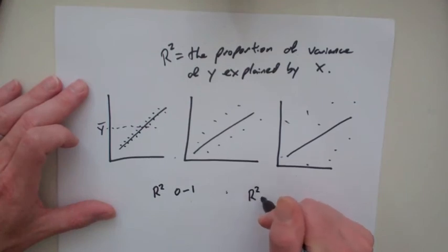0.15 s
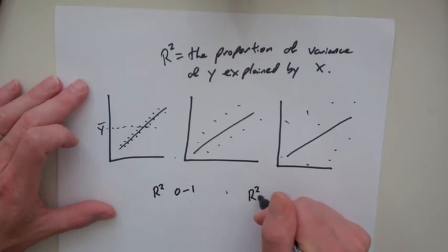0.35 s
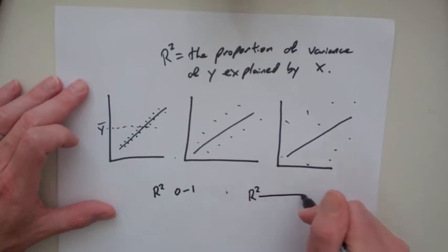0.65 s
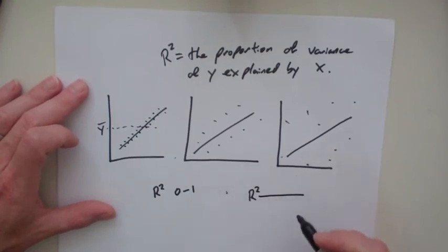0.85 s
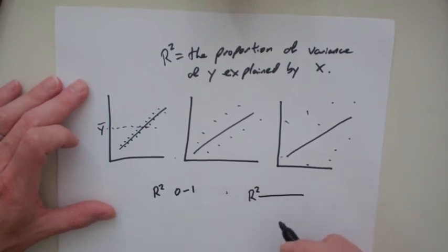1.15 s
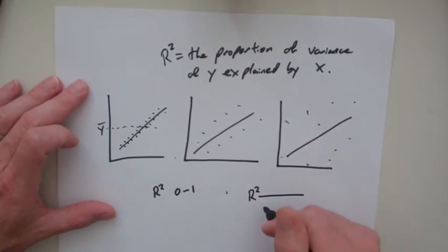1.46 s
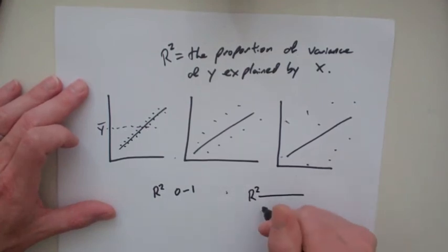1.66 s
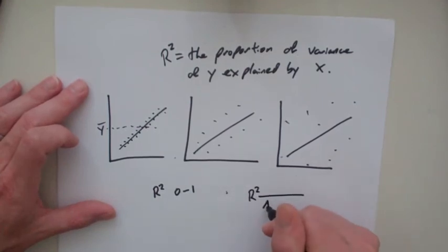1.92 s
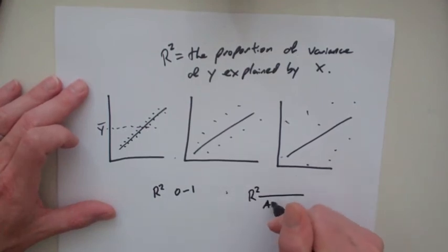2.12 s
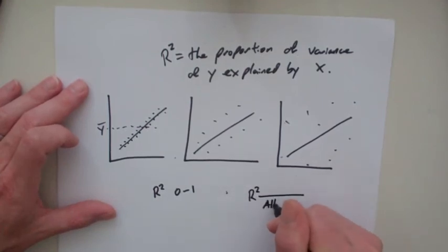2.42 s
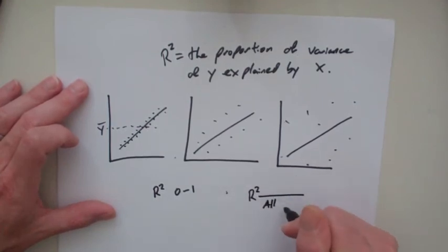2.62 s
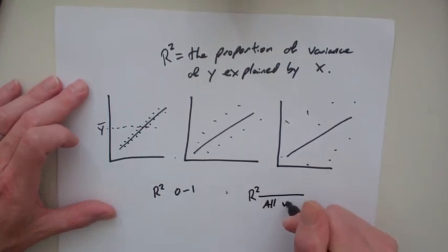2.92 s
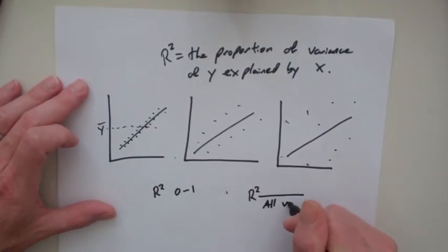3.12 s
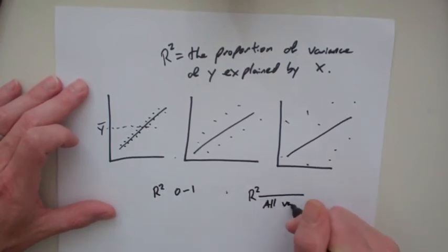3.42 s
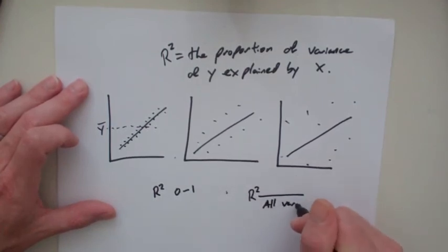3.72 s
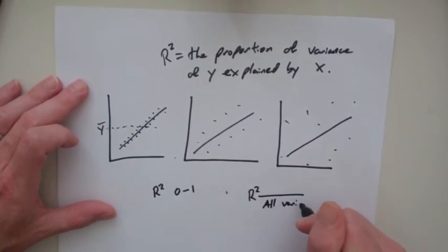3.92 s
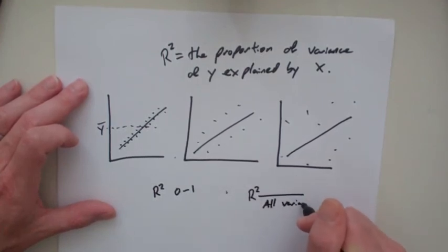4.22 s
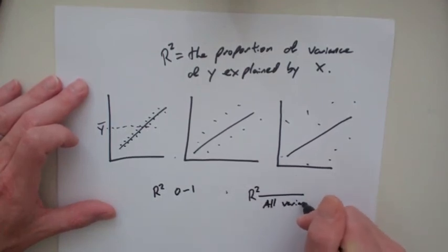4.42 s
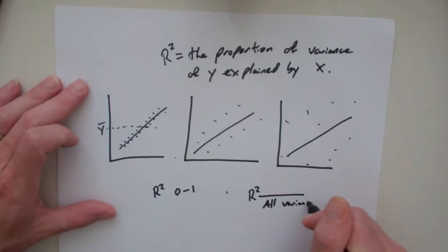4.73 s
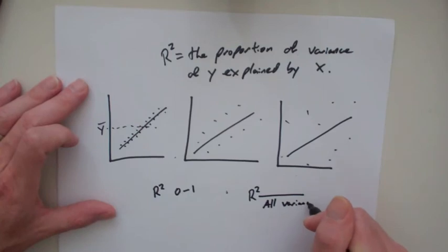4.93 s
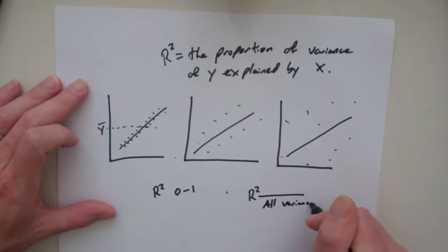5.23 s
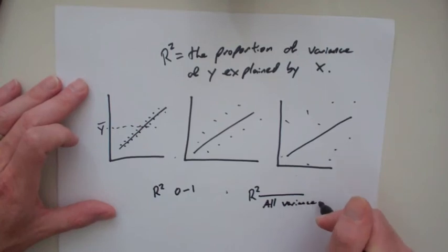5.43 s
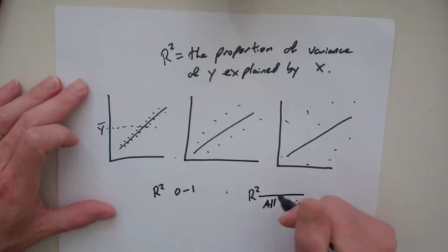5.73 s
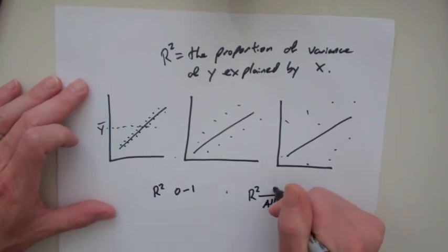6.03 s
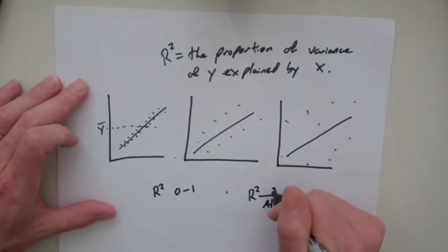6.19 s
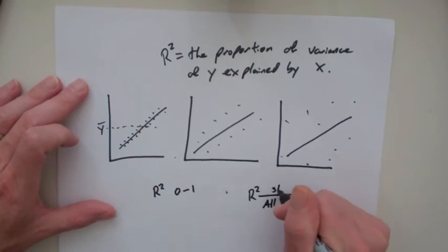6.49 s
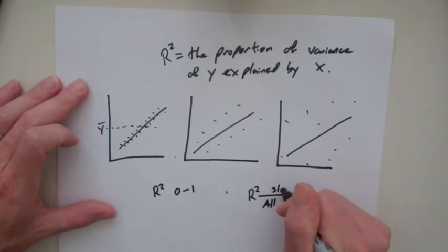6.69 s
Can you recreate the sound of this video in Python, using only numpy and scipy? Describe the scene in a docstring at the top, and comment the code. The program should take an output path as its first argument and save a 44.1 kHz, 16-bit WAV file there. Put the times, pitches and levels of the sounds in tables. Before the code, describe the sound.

In a small, quiet room with a faint low fan hum, someone writes on paper with a marker, heard up close. First comes one quick drawn line, then a loud, sharp plastic click of the pen in the hand. Soft, irregular scratches and taps of the nib follow, and near the end a few presses knock faintly on the desk beneath.

```python
"""Felt marker on paper

At a desk in a small room, close under a camera's stereo microphone, a marker rules a line and writes a few
words. Its nib scratches over the paper fibres stroke by stroke; its plastic barrel clicks once in the hand. The
room answers faintly and a fan and the mains hum in the background."""
import sys
import numpy as np
from scipy import signal
from scipy.fft import rfft, irfft, next_fast_len
from scipy.io import wavfile
from scipy.ndimage import map_coordinates

SR = 44100
rng = np.random.default_rng(int(sys.argv[2]) if len(sys.argv) > 2 else 0)


def dump_mix(stems):
    """Bounce the given channels to the path in sys.argv[1] as a 16-bit WAV at rate SR."""
    frames = np.atleast_2d(stems).T  # one column per channel
    limited = np.clip(frames, -1, 1)  # hard clip at full scale
    pcm = np.round(limited * 32767).astype(np.int16)
    wavfile.write(sys.argv[1], SR, pcm)


N = 302305
BAND_LIMIT_HZ = 14330

# the nib landing already in motion: t/s, length/s, fastest point/share of length, hiss level/dB
NIB_STROKES = [(1.763, 0.08, 0.074, -31.5), (1.867, 0.081, 0.067, -35.5), (2.058, 0.056, .24, -47),
               (2.25, 0.057, 0.28, -32), (2.435, 0.063, 0.43, -35), (3.476, 0.042, .14, -37.5),
               (4.089, 0.019, .3, -44), (4.158, 0.021, 0.38, -51), (4.444, 0.02, .25, -43),
               (4.835, .018, 0.23, -42.5), (5.273, 0.055, 0.092, -44), (5.351, 0.028, .2, -46),
               (6.072, 0.042, 0.41, -46.5), (6.439, 0.06, 0.079, -37.5), (6.722, 0.013, 0.42, -38)]


def strokes():
    """Close to the microphone the nib lands with a bright tap and scratches on; firmer is brighter."""
    out = np.zeros((2, N))
    middling_db = -46
    for start, length, fastest, db in NIB_STROKES:
        firm_db = db - middling_db
        stroke = scratch(length, dict(fastest=fastest, rise=0.48, fall=1.55), nib_hz=8350, nib_lift=1.04,
                         scrape_db=-3.5 - 0.79 * firm_db, fizz_db=-4 + 0.59 * firm_db)
        add(out, start, amp(db) * stroke)
        tap = filtered(crack(t60=0.015), lambda hz: .5 * colour(NIB_HISS, hz) + colour(NIB_FIZZ, hz))
        add(out, start, amp(db - 5) * tap)
    return out


# the nib easing into a curve or light flick: t/s, length/s, hiss level/dB
NIB_GLIDES = [(-.01, .068, -49.5), (0.099, 0.1, -57), (0.689, 0.13, -54.5), (0.913, 0.13, -50.5),
              (2.554, 0.13, -49.5), (2.822, 0.052, -44), (2.9, 0.057, -36.5), (3.181, 0.067, -47),
              (3.256, 0.042, -46.5), (3.307, 0.041, -57), (3.535, 0.038, -55), (4.107, 0.15, -57),
              (4.48, .06, -57), (4.594, .06, -57.5), (4.846, 0.051, -53), (5.373, 0.096, -45),
              (5.486, 0.15, -54.5), (6.127, 0.062, -46), (6.182, 0.081, -45), (6.63, 0.072, -52.5),
              (6.689, 0.04, -44.5), (6.737, .045, -49)]


def glides():
    """Curves and flicks swell and fade without a tap, all with much the same colour."""
    out = np.zeros((2, N))
    shape = dict(fastest=0.44, rise=0.72, fall=1.1)
    for start, length, db in NIB_GLIDES:
        glide = scratch(length, shape, nib_hz=9100, nib_lift=0.39, scrape_db=-7.5, fizz_db=-0.5)
        add(out, start, amp(db) * glide)
    return out


# close-up spectra of the nib's hiss, its top fizz and the paper's scrape: f/Hz, level/dB
NIB_HISS = [(2500, -21.5), (4200, -5.5), (5000, -6), (6000, -3), (7000, -1.5), (8400, -2), (10000, -2),
            (11300, -2.5), (12500, -5.5), (15000, -42)]
NIB_FIZZ = [(9500, -34), (11400, -9.5), (12700, 1.5), (14000, 4.5), (15000, -14)]
PAPER_SCRAPE = [(250, -33), (650, -6), (900, -4), (1350, -9.5), (1900, -2.5), (2350, -4.5), (3050, 2),
                (3500, -1), (4000, -3), (4500, -10), (5200, -17), (8000, -50)]
# bands swallowed by the fingers round the nib: f/Hz, width/Hz, depth/share
GRIP_HOLLOWS = [(4000, 400, 0.5), (6970, 490, .45)]


def scratch(length, shape, nib_hz, nib_lift, scrape_db, fizz_db):
    """One pull of the nib: its own hiss and fizz over the paper's scrape, both coloured by the hand."""
    t = np.arange(SR // 4) / SR
    speed = swell(t, length, **shape)
    centre_hz = nib_hz * np.exp(.012 * rng.standard_normal())  # varies with the angle of the pen

    def nib(hz):
        ringing = unit(colour(NIB_HISS, hz) * nib_ring(hz, centre_hz, width_hz=770, lift=nib_lift))
        return np.hypot(np.abs(ringing), amp(fizz_db) * colour(NIB_FIZZ, hz))

    def hand(hz):
        hollows = np.prod([nib_ring(hz, at, width, -depth) for at, width, depth in GRIP_HOLLOWS], axis=0)
        return hollows * hand_reflections(hz, strength=0.22, delay_s=0.000645)

    # the scrape rises sooner and holds longer than the hiss
    scrape = filtered(friction(t, speed ** 0.51), lambda hz: colour(PAPER_SCRAPE, hz))
    hiss = filtered(friction(t, speed), nib)
    return filtered(hiss + amp(scrape_db) * scrape, hand)


def swell(t, length, fastest, rise, fall):
    """A stroke speeds up and slows to rest: a skewed sine arch, raised to the powers rise and fall."""
    progress = np.interp(t, [0, fastest * length, length], [0, .5, 1])
    return np.abs(np.sin(np.pi * progress)) ** np.where(progress < .5, rise, fall)


def friction(t, pressure):
    """The nib's drag flutters with the paper's grain; the sheet scatters it differently to each side."""
    flutter = amp(0.99 * map_coordinates(rng.standard_normal(len(t)), [t * 200]))
    drag = fibres(len(t), per_second=2800, spread_db=2.5, rub=0.7)
    scatter_db = [(3000, -37), (5000, -1.5), (13000, -5.0)]
    scatter = filtered(rng.standard_normal((2, len(t))), lambda hz: amp(along(scatter_db, hz)))
    # pressure sets the stroke's whole energy, however the fibres fall
    return unit(pressure * flutter * (drag + scatter)) * np.sqrt(np.mean(pressure ** 2))


def fibres(n, per_second, spread_db, rub):
    """Paper fibres flicked by the nib: dense tiny impulses of uneven size over a smooth rub."""
    flicks = (rng.random(n) < per_second / SR) * rng.choice([-1, 1], n)
    sizes = amp(spread_db * np.minimum(rng.standard_normal(n), 2))
    return unit(unit(flicks * sizes) + rub * rng.standard_normal(n))


def nib_ring(hz, centre_hz, width_hz, lift):
    """A resonance at the nib lifts one band, or hollows it if lift is negative."""
    return 1 + lift * 1j * hz * width_hz / (centre_hz ** 2 - hz ** 2 + 1j * hz * width_hz)


def hand_reflections(hz, strength, delay_s):
    """Fingers, hand and arm reflect to each microphone port, giving every stroke its own hollows."""
    paths_s = delay_s * np.array([1, 2, 3.5]) * amp(2 * rng.standard_normal(3))
    skews_s = 2.5e-5 * rng.standard_normal((3, 2, 1))
    echoes = sum(0.95 * np.exp(-2j * np.pi * hz * (path + skew)) for path, skew in zip(paths_s, skews_s))
    return unit(1 + strength * echoes)


# spectrum of the nib drawn sideways: f/Hz, level/dB
SIDEWAYS_HISS = [(2000, -30), (3400, -13), (4300, -4.5), (4900, -5), (5350, 1.5), (6050, -11), (6600, -4),
                 (7400, -6), (8150, 1), (9100, -1), (9650, 0.5), (10200, -2), (11400, 3), (12400, -1),
                 (12950, 1), (14000, 2), (15000, -10)]


def ruled_line(start_s=.405, length_s=.253):
    """One long pull: the paper scrapes as soon as the nib moves, the hiss swells with its speed."""
    out = np.zeros((2, N))
    t = np.arange(round(length_s * SR)) / SR
    speed = swell(t, length_s, fastest=0.45, rise=0.62, fall=1.3)
    hiss = filtered(friction(t, speed), lambda hz: colour(SIDEWAYS_HISS, hz))
    bite = swell(t, length_s, fastest=0.11, rise=0.61, fall=0.49)
    # drawn sideways, the paper sounds a little lower
    scrape = filtered(friction(t, bite), lambda hz: colour(PAPER_SCRAPE, hz * 1.23))
    swish = amp(-33) * hiss + amp(-45.5) * scrape
    # the path off the travelling hand lengthens, so the hollows of the swish glide down
    delay_s = np.linspace(.000285, .000335, len(t))
    echo = np.array([map_coordinates(port, [(t - delay_s) * SR]) for port in swish])
    add(out, start_s, swish + .42 * echo)
    return out


# spectrum of the plastic barrel: f/Hz, level/dB
BARREL_PLASTIC = [(300, -39), (750, -15), (1200, -26), (1750, -13), (2100, -17), (2650, 0), (3200, -8.5),
                  (4000, -0.5), (4900, -4), (5400, -8), (6100, 1.5), (7100, -0.5), (7750, -11), (9100, 1),
                  (12400, -8), (13800, 10.5), (15000, 5)]


def barrel_click(at_s=1.2239):
    """One sharp plastic click in the hand: a slip that builds for two milliseconds and stops dead."""
    out, t = np.zeros(N), np.arange(-SR // 100, SR // 100) / SR
    envelope = np.exp(np.minimum(t / 0.0012, -t / 0.00049))
    # the slip excites all frequencies alike; the plastic gives it its colour
    phases = np.angle(rfft(envelope * rng.choice([-1, 1], len(t))))
    flat_burst = irfft(np.exp(1j * phases), len(t))
    slip = unit(flat_burst * envelope ** 0.33) * np.sqrt(np.mean(envelope ** 2))
    add(out, at_s + t[0], amp(-7.5) * filtered(slip, lambda hz: colour(BARREL_PLASTIC, hz)))
    return out


# light contacts of pen and paper: t/s, relative level/dB
PEN_TICKS = [(0.385, -41), (0.7022, -41.5), (0.8654, -35.5), (1.1217, -41.5), (2.3304, -43), (3.869, -38.5),
             (6.2477, -34)]


def ticks():
    """Small dry contacts near the microphone: bright, with a little of the paper's body."""
    def tone(hz):
        return colour(NIB_HISS, hz) + .8 * colour(NIB_FIZZ, hz) + amp(-12.5) * colour(PAPER_SCRAPE, hz)

    out = np.zeros(N)
    for start, db in PEN_TICKS:
        add(out, start - .001, amp(db - 7.5) * filtered(crack(t60=0.023), tone))
    return out


def crack(t60):
    """A contact's burst of noise dies at once; a millisecond of quiet comes before it."""
    t = np.arange(SR // 20) / SR
    return np.pad(rng.choice([-1, 1], len(t)) * amp(-60 * t / t60), (SR // 1000, 0))


# the nib pressed hard enough to sound the desk: t/s, level/dB
DESK_KNOCKS = [(6.078, -48.5), (6.094, -51), (6.727, -50.5)]
# modes of the desk top: f/Hz, relative level/dB, t60/s
DESK_MODES = [(628, 2, .07), (704, 4, 0.11), (920, -3, 0.083)]


def desk():
    """The desk under the sheet rings briefly when the nib presses down."""
    out, t = np.zeros(N), np.arange(SR // 4) / SR
    attack = 1 - np.exp(-t / 0.0016)
    for start, db in DESK_KNOCKS:
        ring = sum(amp(level - 60 * t / t60) * np.sin(2 * np.pi * (hz * t + rng.random()))
                   for hz, level, t60 in DESK_MODES)
        add(out, start, amp(db) * ring * attack)
    return out


# the microphone's left port against its right: f/Hz, level/dB
PORT_BALANCE = [(4000, -0.5), (6000, 0.5), (10500, 0), (11800, -1.5), (14000, -5.5)]


def at_microphone(x, lead_s):
    """Direct sound from the desk reaches the right port first, and with more top."""
    sides = np.array([[1], [-1]])

    def response(hz):
        return amp(sides * along(PORT_BALANCE, hz) / 2) * np.exp(-1j * np.pi * hz * lead_s * sides)

    return filtered(x, response)


# decay of the small room: f/Hz, t60/s
ROOM_DECAY = [(300, 0.75), (3000, 0.37), (10000, 0.3), (15000, 0.2)]


def room(x):
    """A diffuse tail, different at each port and for each place of the pen, whose treble dies first."""
    out, block = np.zeros((2, N)), SR // 4
    for start in range(0, N, block):
        hz, t, noise = signal.stft(rng.standard_normal((2, SR // 2)), SR, nperseg=256)
        decay = amp(-60 * t / along(ROOM_DECAY, hz)[:, None])
        tail = signal.istft(noise * decay, SR, nperseg=256)[1]
        tail /= np.linalg.norm(tail[0])
        add(out, start / SR + .004, signal.fftconvolve(x[None, start:start + block], tail, axes=1))
    return out


# tones of the fan and of the mains hum at the microphone: f/Hz, level/dB, unsteadiness/share
HUM_TONES = [(140.4, -60.5, 1), (162.5, -58, 0.58), (192.6, -61.5, 0.84), (224.8, -65.5, 0.9),
             (257.5, -65, 0.79), (289.4, -64, 0.82), (352.2, -66.5, 0.65), (400, -57, 0.75),
             (442, -66, 0.7), (460.6, -65.5, 0.79), (591, -72, 0.47)]
# spectrum of its rush of air: f/Hz, level/dB
FAN_RUSH = [(15, -43), (30, -15.5), (55, -15.5), (78, -2), (110, -6.5), (165, 0.5), (280, -4.5), (325, -11),
            (420, -7), (490, -6), (560, -17), (800, -16.5), (1600, -29.5), (8000, -55)]


def fan():
    """A fan and mains hum in the background: wavering tones and a low rush, nearly alike in both ports."""
    t = np.arange(N) / SR
    hum = 0
    for hz, db, unsteady in HUM_TONES:
        swing = unit(1 - unsteady + unsteady * (wobble(12) + 1j * wobble(12)))
        hum += amp(db) * np.sqrt(2) * np.real(swing * np.exp(2j * np.pi * hz * t))
    mid, side = filtered(rng.standard_normal((2, N)), lambda hz: colour(FAN_RUSH, hz))
    # above the bass, shorter waves differ more between the ports
    side_db = [(30, -12), (120, -23.5), (300, -12), (600, -10.5), (1200, -4.0)]
    side = filtered(side, lambda hz: amp(along(side_db, hz)))
    return hum + amp(-51.5) * np.array([mid + side, mid - side])


# spectrum of the microphone's self-noise: f/Hz, level/dB
SELF_NOISE = [(200, -13), (1000, -3), (3000, 0), (7000, -0.5), (10000, -0.5), (12500, 1.5), (14000, 2.5)]


def microphone_hiss():
    """Each side of the microphone adds its own faint hiss."""
    return amp(-57) * filtered(rng.standard_normal((2, N)), lambda hz: colour(SELF_NOISE, hz))


def amp(db):
    """Decibels to gain."""
    return 10 ** (np.asarray(db) / 20)


def unit(x):
    """Scaled to rms 1."""
    return x / np.sqrt(np.mean(np.abs(x) ** 2) + 1e-20)


def along(points, hz):
    """Interpolate (Hz, value) points on a log axis."""
    f, v = np.transpose(points)
    return np.interp(np.log(hz + 1), np.log(f), v)


def colour(points, hz):
    """A spectrum as a band-limited gain that keeps the power of white noise."""
    return unit(amp(along(points, hz)) * (hz < BAND_LIMIT_HZ))


def filtered(x, response):
    """x through a complex response of frequency."""
    n = x.shape[-1]
    m = next_fast_len(n + SR // 20)
    return irfft(rfft(x, m) * response(np.fft.rfftfreq(m, 1 / SR)), m)[..., :n]


def wobble(rate):
    """A smooth random curve, rate knots a second."""
    return map_coordinates(rng.standard_normal(int(N * rate / SR) + 4), [np.arange(N) * rate / SR])


def add(track, s, sound):
    """Mix a sound into the track at s seconds."""
    start = round(s * SR)
    part = sound[..., max(-start, 0):N - start]
    track[..., max(start, 0):][..., :part.shape[-1]] += part


def scene():
    """Pen, paper and desk close to the microphone, with the room and the fan behind."""
    pen = strokes() + glides() + ruled_line() + ticks() + desk()
    click = barrel_click()
    reverb = room(amp(-11) * pen.mean(axis=0) + amp(-7) * click)
    return at_microphone(pen + click, lead_s=2.5e-5) + reverb + fan() + microphone_hiss()


def record(dry):
    """The camera rounds off the highest peak and cuts steeply above its band limit."""
    rounded = dry / (1 + (np.abs(dry) / .7) ** 4) ** .25
    return filtered(rounded, lambda hz: 1 / np.sqrt(1 + (hz / BAND_LIMIT_HZ) ** 160))


dry = scene()
out = record(dry)
dump_mix(out)
```